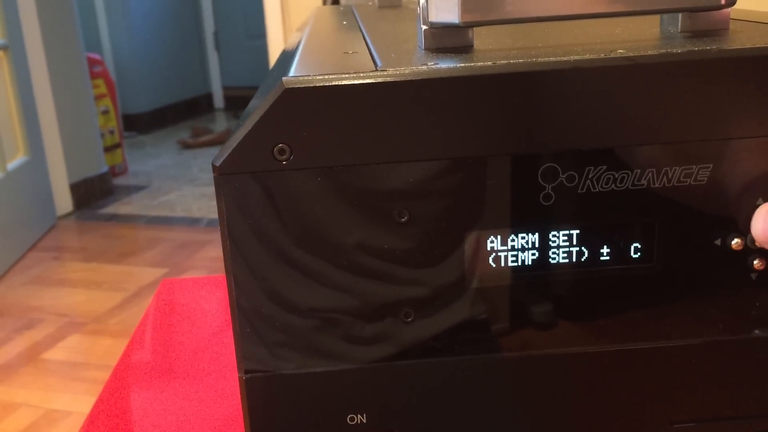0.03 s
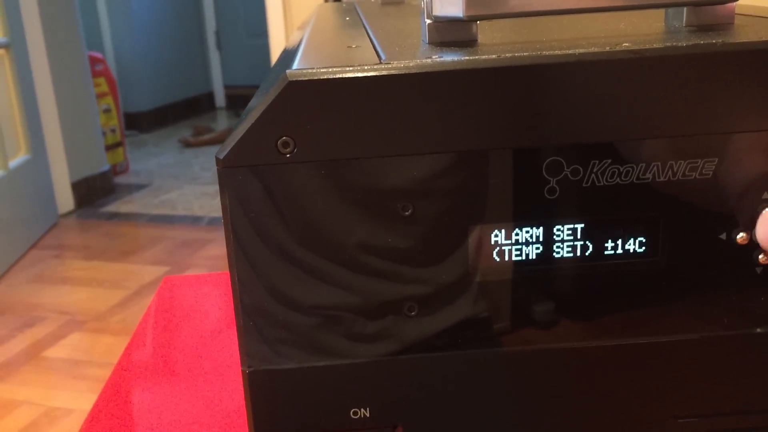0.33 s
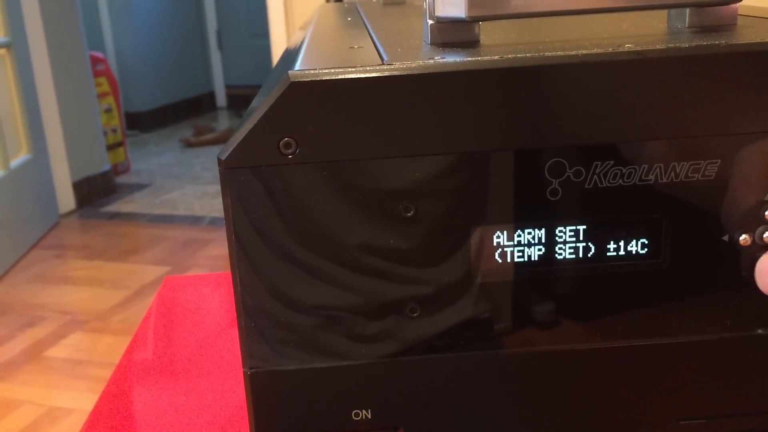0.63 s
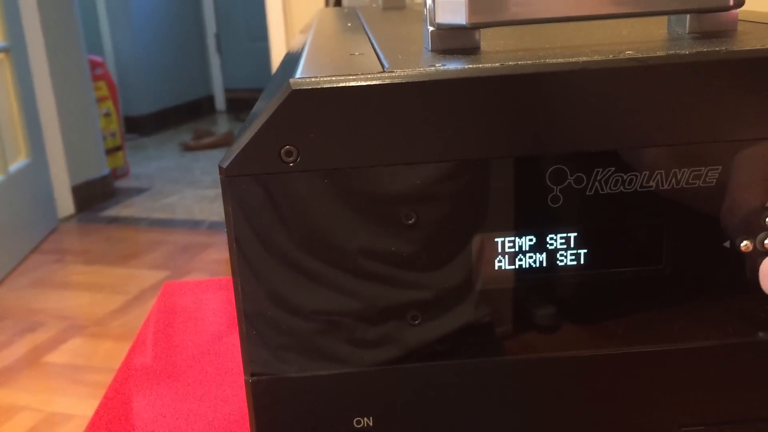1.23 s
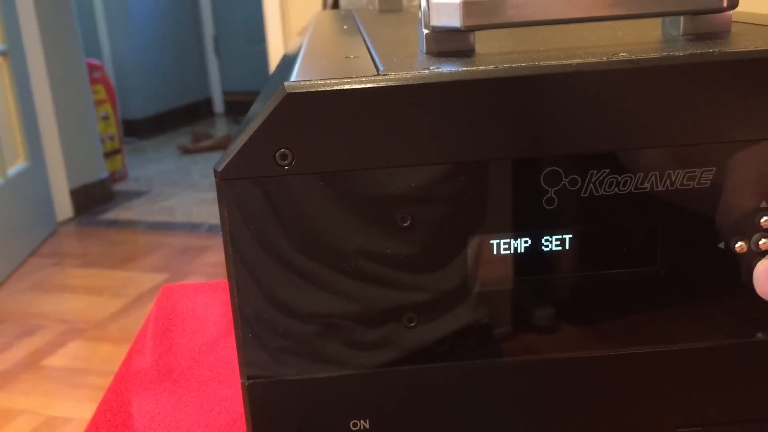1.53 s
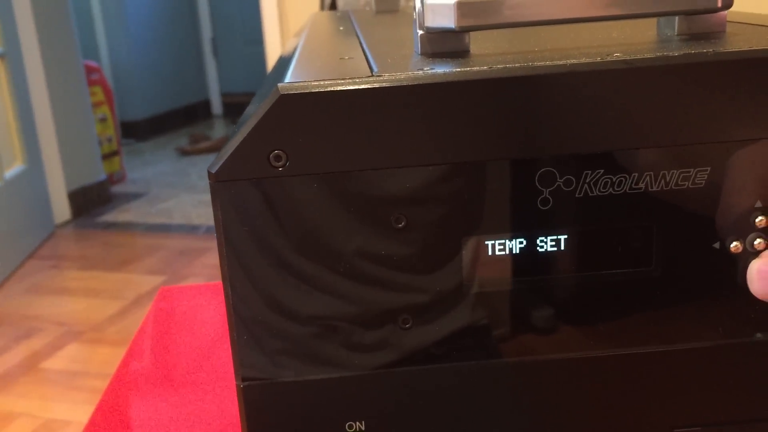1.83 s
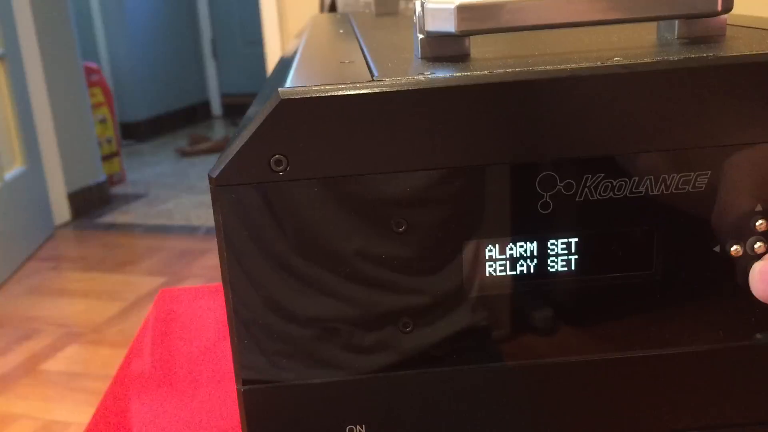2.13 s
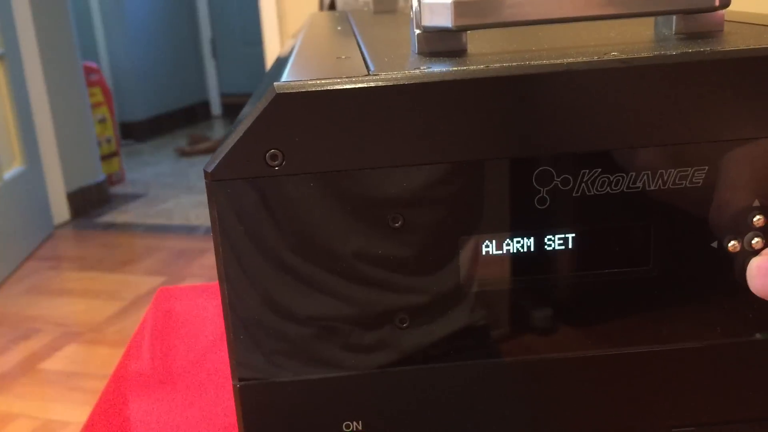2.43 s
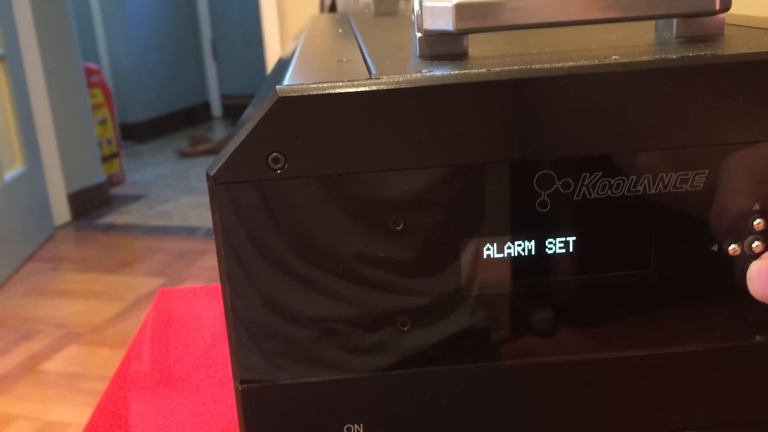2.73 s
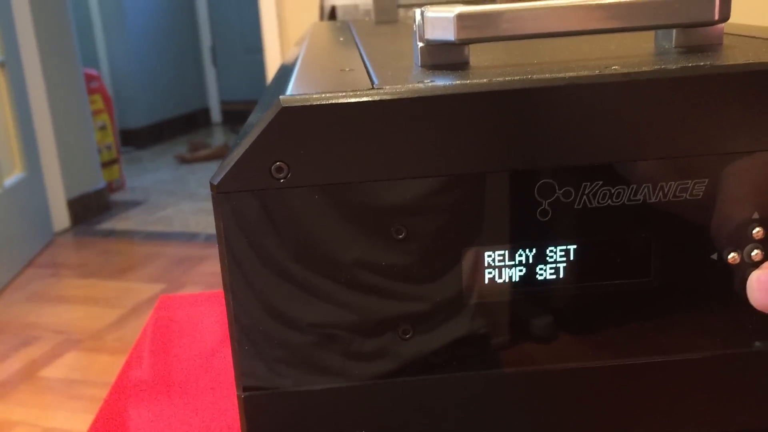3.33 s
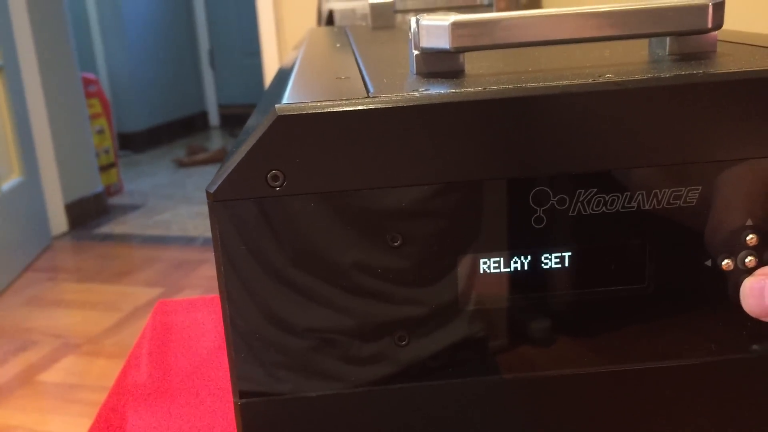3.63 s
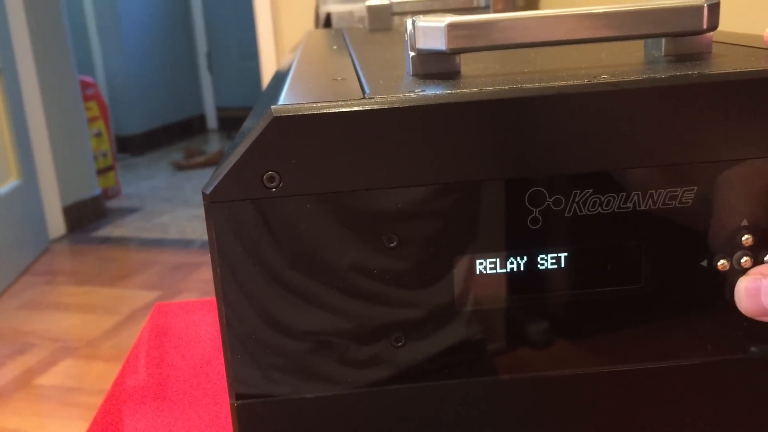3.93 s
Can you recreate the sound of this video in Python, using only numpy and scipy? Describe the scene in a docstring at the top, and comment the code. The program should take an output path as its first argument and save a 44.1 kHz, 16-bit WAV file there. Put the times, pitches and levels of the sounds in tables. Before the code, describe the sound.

The steady pump whine and fan noise of a cooling unit are heard up close in a room. A fingertip lightly touches a button, then makes four evenly spaced clicks, each with a slight springy ring and short echo.

```python
"""A steady pump whine over a rush of fan air and a faint mains hum: a liquid cooling unit in a room.
The whine is a stack of tones on multiples of the pump's shaft rate; the cabinet colours the air.
A finger brushes and touches a button on the front, then makes four presses. Each snaps, knocks the
panel and leaves a thin metallic ring, likely the return spring, with a short room tail behind it."""
import sys
import numpy as np
from scipy import signal
from scipy.fft import rfft, irfft
from scipy.io import wavfile

SR = 44100
rng = np.random.default_rng(int(sys.argv[2]) if len(sys.argv) > 2 else 0)


def to_wav(s):
    """Save 16-bit WAV."""
    ch = np.atleast_2d(s).T  # columns
    pcm = np.round(np.clip(ch, -1, 1) * 32767)  # PCM
    wavfile.write(sys.argv[1], SR, pcm.astype(np.int16))


N = 176400
T = np.arange(N) / SR
HIT_T = T[:SR // 2]   # half a second for each one-shot
BOUNCE_S = 0.01   # gap between the spring's two slaps


def from_db(db):
    """Decibels to gain."""
    return 10 ** (np.asarray(db) / 20)


def drift(rate):
    """Smooth random modulation of unit spread, rolling off above rate in Hz."""
    step, run_in = 40, 2000
    pole = np.exp(-2 * np.pi * rate * step / SR)
    white = rng.standard_normal(N // step + run_in + 2)
    slow = signal.lfilter([1], [1, -2 * pole, pole * pole], white)[run_in:]
    return np.interp(np.arange(N) / step, np.arange(len(slow)), (slow - slow.mean()) / slow.std())


def noise(spectrum, size):
    """Noise shaped by points of Hz and dB per Hz, falling away below the first point."""
    hz, db = np.transpose(spectrum)
    f = np.maximum(np.fft.rfftfreq(size, 1 / SR), 1)
    gain = from_db(np.interp(np.log(f), np.log(hz), db)) * np.minimum(f / hz[0], 1) ** 2
    return irfft(rfft(rng.standard_normal(size)) * gain, size) * np.sqrt(SR / 2)


def tones(rows):
    """Steady sines from rows of Hz and rms level in dB."""
    return np.sqrt(2) * sum(from_db(db) * np.sin(2 * np.pi * (hz * T + rng.random())) for hz, db in rows)


def decay(t60):
    """Envelope that loses 60 dB in t60 seconds."""
    return np.exp(-np.log(1000) * HIT_T / t60)


def burst(spectrum, t60, rise_s):
    """A contact excites many close, short-lived modes, heard as a tick of coloured noise."""
    x = noise(spectrum, size=len(HIT_T))
    return x / x.std() * decay(t60) * (1 - np.exp(-HIT_T / rise_s))


def add(track, s, sound):
    """Mix a sound in at s seconds."""
    part = track[int(s * SR):][:len(sound)]
    part += sound[:len(part)]


def pump():
    """A whine of tones locked to the shaft, each swaying and fluttering in level on its own."""
    # Shaft speed. Each row: time in seconds, turns per second.
    shaft = [(0, 89.3), (0.29, 89.6), (0.37, 89), (0.5, 89.7), (0.72, 89.11), (1.35, 89.09), (1.5, 89.27),
             (1.59, 89.0), (1.68, 89.16), (1.77, 88.97), (1.94, 88.3), (2.03, 89.15), (2.12, 88.95),
             (2.3, 89.4), (2.66, 89.15), (2.8, 89.2), (3.1, 89.09), (3.24, 89.0), (3.45, 89.3),
             (3.66, 89.3), (3.78, 88.5), (4, 89.3)]
    # Partials of the whine. Each row: multiple of the shaft rate, base level in dB.
    partials = [(1, -67), (7, -65), (8, -39.5), (12, -60), (14, -67.5), (16, -48.5), (20, -45.5),
                (21, -69.5), (22, -58.5), (24, -55.5), (25, -66), (26, -70), (28, -54), (29, -73.5),
                (30, -83.5), (31, -83.5), (32, -71.7), (40, -76), (48, -81), (72, -83.5), (84, -84.4),
                (85, -88.5), (86, -84.5)]
    # One overtone dips as the listening point shifts in the room's standing waves.
    # Each row: time in seconds, level offset in dB.
    shifting = [(0, 0.5), (0.25, -4.5), (0.6, -3), (0.8, 0.5), (2.0, 0), (3.0, 0), (3.7, 0), (4.0, -6)]
    vane_order, shifting_order = 8, 16
    speed = np.interp(T, *np.transpose(shaft)) + 0.025 * drift(rate=10)
    angle = 2 * np.pi * np.cumsum(speed) / SR
    whine = 0
    for order, db in partials:
        sway_db = 0.7 * (0.34 if order == vane_order else 1) * drift(rate=1.6)   # vane tone sways least
        if order == shifting_order:
            sway_db += np.interp(T, *np.transpose(shifting))
        flutter_db = 0.65 * drift(rate=12)
        whine += from_db(db + sway_db + flutter_db) * np.sin(order * angle + rng.uniform(0, 2 * np.pi))
    return np.sqrt(2) * whine


def mains_hum():
    """A faint hum at the mains frequency and its octave."""
    # Hum tones. Each row: frequency in Hz, level in dB.
    hum = [(60, -76.5), (120, -61.5)]
    return tones(hum)


def fans():
    """Slightly turbulent air, coloured by the cabinet's resonances, and faint motor tones."""
    # Air through the cabinet. Each row: frequency in Hz, base level in dB per Hz.
    air = [(25, -104.5), (40, -95), (60, -89), (100, -81), (150, -80), (180, -79), (207, -71), (255, -78),
           (300, -64), (350, -77.5), (390, -78), (430, -69.5), (490, -83), (560, -85.5), (640, -77),
           (710, -78.5), (800, -80), (1000, -83.5), (1300, -85), (1600, -84.5), (2000, -85), (2350, -89.0),
           (2520, -89), (2700, -101.2), (2880, -99.2), (3050, -107.9), (3400, -104.3), (4200, -106.8),
           (4900, -112.7), (6300, -108.1), (8000, -111.9), (9500, -118.0), (10400, -123.8), (11200, -119.6),
           (15000, -123.7)]
    # Fan motor tones. Each row: frequency in Hz, level in dB.
    motors = [(1530, -69), (1653, -66), (1697, -72), (2250, -69.5)]
    lift_db, turbulence_db = 0.5, 0.5
    return noise(air, size=N) * from_db(lift_db + turbulence_db * drift(rate=14)) + tones(motors)


def touch(t60, rise_s):
    """A fingertip meets a button with a light, bright tick."""
    # Colour of the touch. Each row: frequency in Hz, relative level in dB.
    colour = [(2000, -18), (3800, -10), (4700, -3), (5300, -12), (6100, 4), (7200, -11), (8000, -4),
              (9500, -17), (12000, -16), (15000, -28)]
    return burst(colour, t60, rise_s)


def snap():
    """The button gives way with a crisp click."""
    # Colour of the snap. Each row: frequency in Hz, relative level in dB.
    colour = [(900, -15.5), (2000, -3), (2700, -3), (3500, 2.5), (4500, -1), (4900, -5), (5600, -3),
              (7200, -15.5), (8300, -11), (9800, -22.5), (12000, -19.5), (15000, -27)]
    return burst(colour, t60=0.014, rise_s=0.00079)


def knock(pitch):
    """The button bottoms out: the panel's modes swell for a moment and die quickly."""
    # Front panel modes. Each row: base frequency in Hz, relative level in dB, t60 in seconds.
    panel = [(1160, -16.5, 0.03), (1406, -7.5, 0.016), (1525, -1.5, 0.012), (1835, -10, 0.02),
             (2297, -22, 0.021), (2927, -23, 0.023)]
    rise_s = 0.0011
    ring = sum(from_db(db) * decay(t60) * np.sin(2 * np.pi * hz * pitch * HIT_T) for hz, db, t60 in panel)
    return ring * (1 - np.exp(-(HIT_T / rise_s) ** 2))


def slap(pitch):
    """The spring slaps with a short, bright ping, coloured a little differently each time."""
    # Modes of the ping. Each row: base frequency in Hz, relative level in dB, t60 in seconds.
    modes = [(4100, -2.5, 0.017), (4340, -8, 0.016), (5750, -9, 0.013), (11200, -17, 0.008),
             (12250, -13, 0.0084)]
    spread_db, rise_s = 1.0, 0.0006
    ping = 0
    for hz, db, t60 in modes:
        gain = from_db(db + rng.normal(0, spread_db))
        ping += gain * decay(t60) * np.sin(2 * np.pi * hz * pitch * HIT_T)
    return ping * (1 - np.exp(-(HIT_T / rise_s) ** 2))


def spring(pitch):
    """A cluster of close modes builds up between the two slaps and rings on as the coils chatter."""
    # Return spring modes. Each row: base frequency in Hz, relative level in dB, t60 in seconds.
    modes = [(3220, -18, 0.18), (3780, -14.5, 0.16), (3900, -11.5, 0.15), (3890, -7, 0.2),
             (4086, -8.5, 0.27), (4195, -11.5, 0.36), (4240, -14, 0.38), (4402, -13.5, 0.22),
             (4535, -13.5, 0.19), (4540, -7, 0.13), (4790, -19, 0.12), (5300, -21, 0.09),
             (5600, -17.5, 0.095), (12410, -30, 0.1)]
    detune_hz = 8
    ring = 0
    for hz, db, t60 in modes:
        chatter_db = 3.5 * drift(rate=150)[:len(HIT_T)]
        turns = (hz * pitch + rng.normal(0, detune_hz)) * HIT_T + rng.random()
        ring += from_db(db + chatter_db) * decay(t60) * np.sin(2 * np.pi * turns)
    return ring * np.minimum(HIT_T / BOUNCE_S, 1)


def buttons():
    """Light touches; then for each press a snap, a knock, two slaps and the spring's ring."""
    # The fingertip brushes, then touches. Each row: start in seconds, gain in dB, rise and t60 in seconds.
    touches = [(0.7780, -59, 0.003, 0.1), (0.8220, -42, 0.00054, 0.022)]
    # Button presses. Each row: start in seconds, gains of knock, snap, spring and slap in dB,
    # slap delay in seconds, pitch ratios of spring and panel.
    presses = [(0.9238, -14, -32, -58.5, -47, 0.017, 1.09, 1.03),
               (1.7945, -17.5, -36, -42.5, -43, 0.0095, 1.0, 1.0),
               (2.9603, -14, -36, -41.5, -40.5, 0.012, 1.0, 1.0),
               (3.9227, -13.5, -32.5, -47.5, -42, 0.0077, 1.0, 1.012)]
    knock_delay_s = 0.000883
    out = np.zeros(N)
    for s, db, rise_s, t60 in touches:
        add(out, s, from_db(db) * touch(t60, rise_s))
    for s, knock_db, snap_db, spring_db, slap_db, slap_delay, spring_pitch, panel_pitch in presses:
        add(out, s, from_db(snap_db) * snap())
        add(out, s + knock_delay_s, from_db(knock_db) * knock(panel_pitch))
        add(out, s + slap_delay, from_db(spring_db) * spring(spring_pitch))
        for bounce in range(2):
            add(out, s + slap_delay + bounce * BOUNCE_S, from_db(slap_db) * slap(spring_pitch))
    return out


def room(x):
    """The direct sound, followed by two near echoes and a short tail that are slightly duller."""
    # Reflections off nearby surfaces. Each row: delay in seconds, gain in dB.
    echoes = [(0.0030, -16), (0.0063, -9)]
    tail_db, damping_hz = -9, 17640
    fade = decay(t60=0.44)
    tail = rng.standard_normal(len(HIT_T)) * fade * (HIT_T > echoes[-1][0])
    response = tail * from_db(tail_db) / np.linalg.norm(fade)
    for s, db in echoes:
        response[int(s * SR)] += from_db(db)
    response = signal.sosfilt(signal.butter(1, damping_hz, fs=SR, output="sos"), response)
    return x + signal.fftconvolve(x, response)[:N]


def scene():
    """Close by, in mono: the running unit as a dry bed, the buttons on top with room reverb."""
    return (pump() + mains_hum() + fans() + room(buttons()))[None]


def record(dry):
    """A steep low-pass takes off the very top."""
    cutoff_hz = 15150
    return signal.sosfilt(signal.ellip(10, .1, 80, cutoff_hz, fs=SR, output="sos"), dry)


dry = scene()
out = record(dry)
to_wav(out)
```